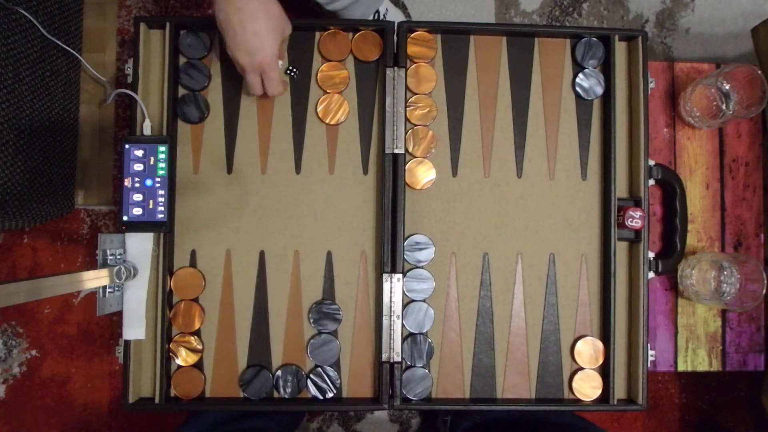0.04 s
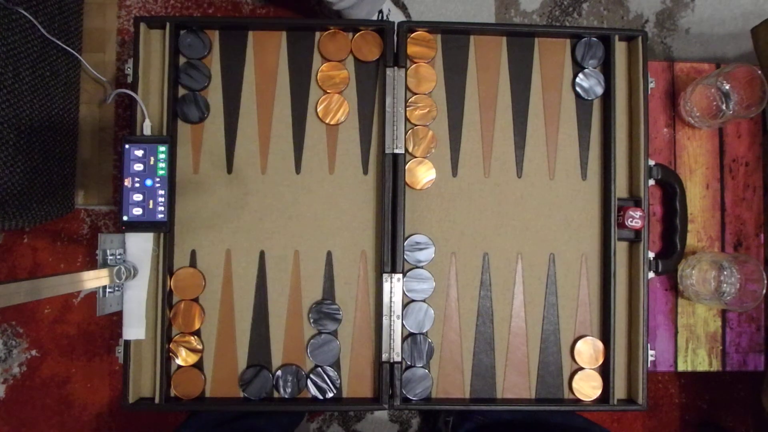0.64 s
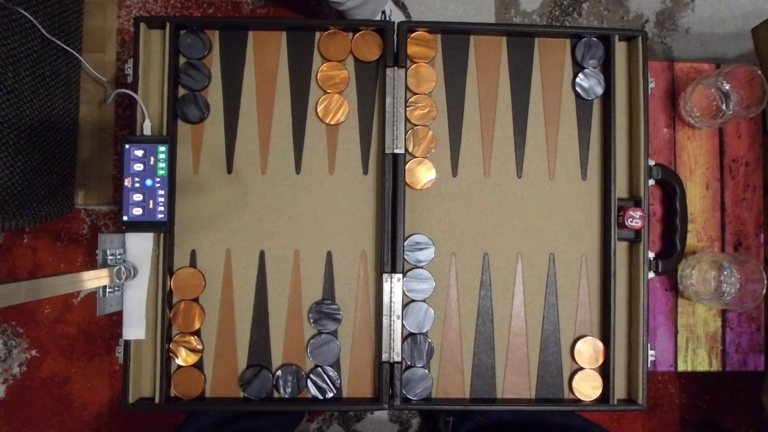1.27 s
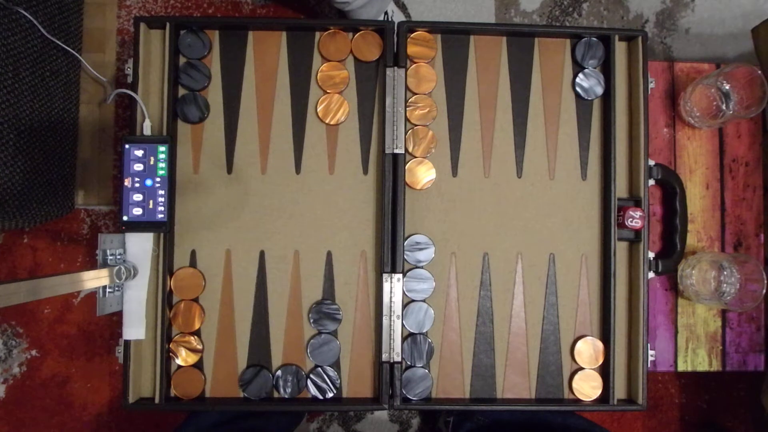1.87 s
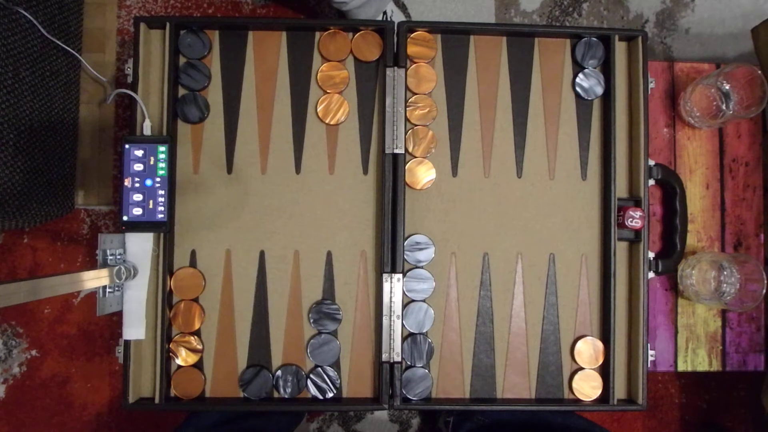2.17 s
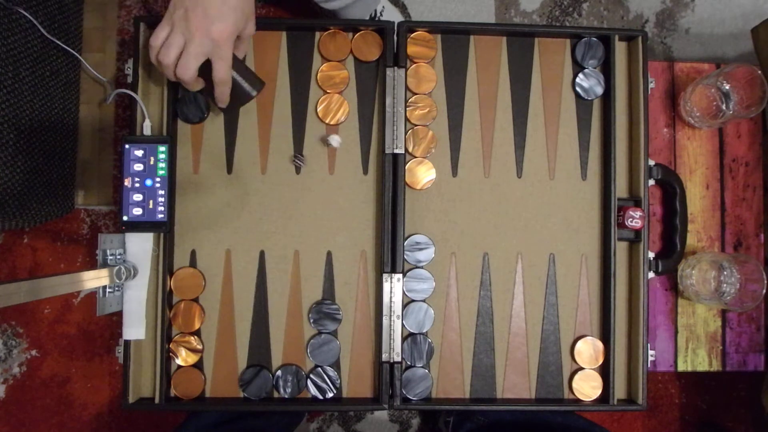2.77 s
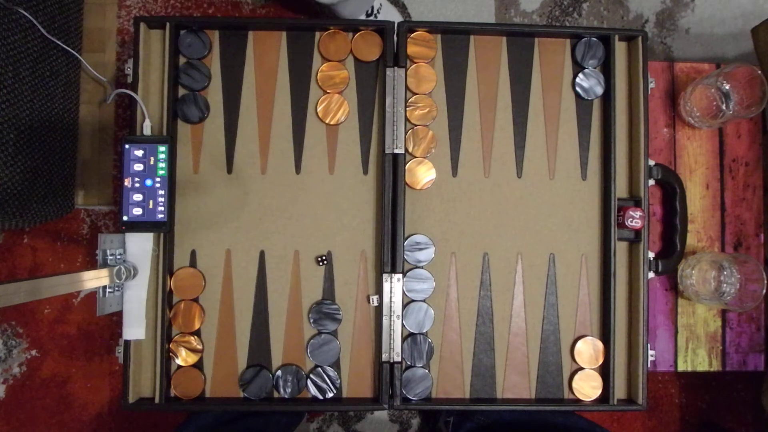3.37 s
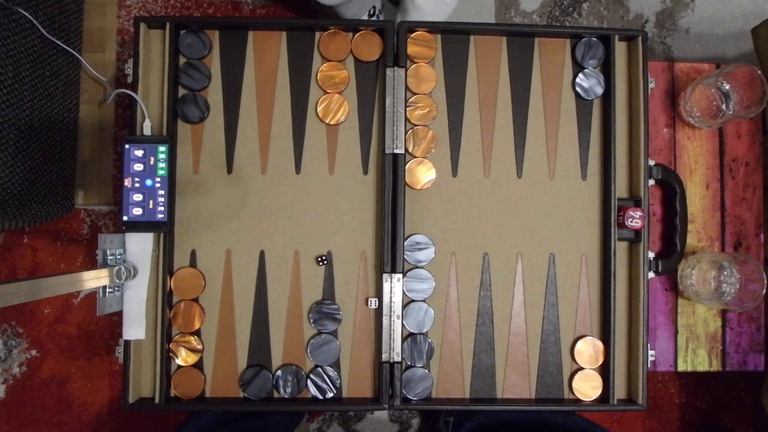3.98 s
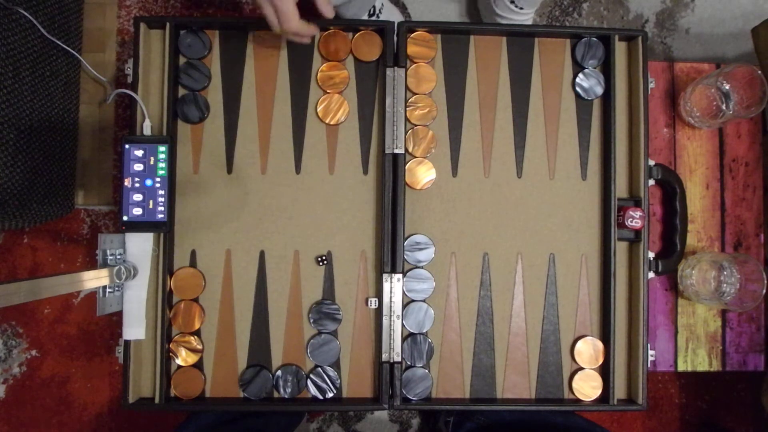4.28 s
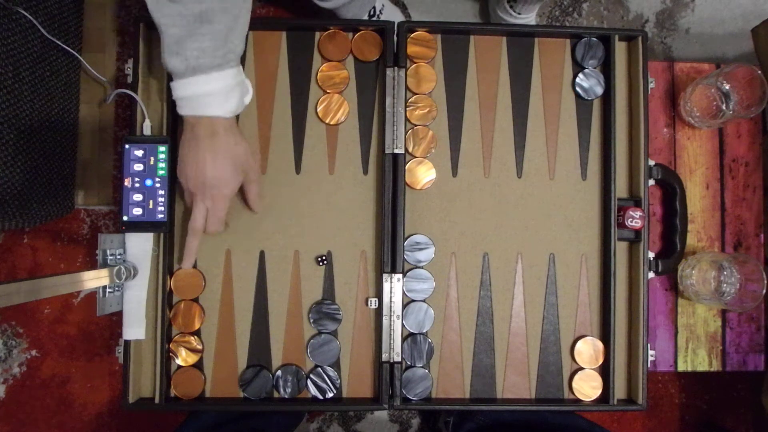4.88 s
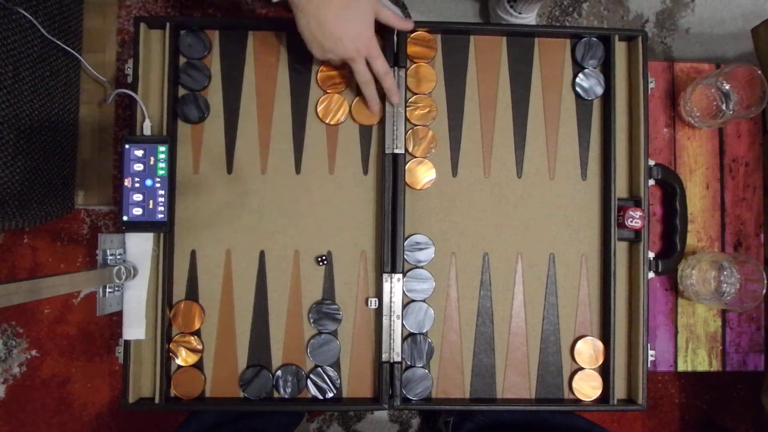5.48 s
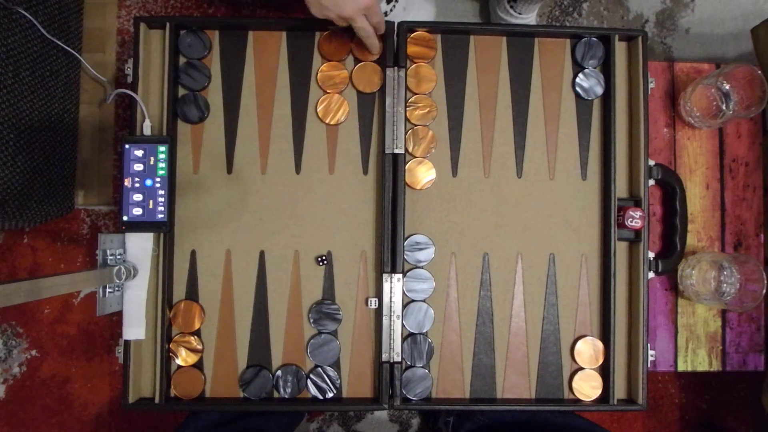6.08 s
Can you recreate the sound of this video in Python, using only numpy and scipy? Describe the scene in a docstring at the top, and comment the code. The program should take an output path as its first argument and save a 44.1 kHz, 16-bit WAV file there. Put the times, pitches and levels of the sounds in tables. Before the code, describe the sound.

Two dice are shaken in a hollow cup and thrown with sharp wooden knocks, followed by a sliding checker and one clack.

```python
"""A small room with a backgammon game, heard from above the board.
Two dice are picked up and shaken in a hand-covered cup: they click together, knock on its wall
and make its air column hoot at every bump. Thrown, they thud over the wooden board, ring its case
and settle on the felt. The cup slides aside with a rumble, and a checker is put down and pushed
against its neighbour with a clack. Room tone and a soft hiss lie underneath."""
import sys
import numpy as np
from scipy import signal
from scipy.fft import rfft, irfft
from scipy.io import wavfile

SR = 44100
rng = np.random.default_rng(int(sys.argv[2]) if len(sys.argv) > 2 else 0)


def wav_record(signal):
    """Record a signal, one row per channel, as 16-bit PCM in the file named by sys.argv[1]."""
    frames = np.transpose(np.atleast_2d(signal))
    bounded = np.clip(frames, -1, 1)
    # unit amplitude maps onto the largest positive 16-bit level
    quanta = np.round(bounded * 32767).astype(np.int16)
    wavfile.write(sys.argv[1], SR, quanta)


N = 270333
SCENE_T = np.arange(N) / SR
HIT_T = np.arange(SR // 2) / SR  # time axis of one hit
HZ = np.fft.rfftfreq(len(HIT_T), 1 / SR)


def amp(db):
    """Decibels to gain."""
    return 10 ** (np.asarray(db) / 20)


def unit(x):
    """Scales to energy 1."""
    return x / np.sqrt(np.sum(x ** 2) + 1e-20)


def peaked(x, db):
    """Scales the envelope's peak to db."""
    return amp(db) * x / abs(signal.hilbert(x)).max()


def curve(points, hz):
    """Reads a table on a log-frequency axis."""
    knots_hz, values = np.transpose(points)
    return np.interp(np.log(hz + 1), np.log(knots_hz), values)


def add(mix, s, sound):
    """Lays a sound into the mix at s seconds."""
    part = mix[max(round(s * SR), 0):][:len(sound)]
    part += sound[:len(part)]


def colour(x, gain_db):
    """Minimum-phase EQ for one hit, with its gains on the axis HZ."""
    log_gain = np.log(amp(gain_db))
    mirrored = np.concatenate([log_gain, log_gain[-2:0:-1]])
    response = np.exp(np.conj(signal.hilbert(mirrored)))[:len(HZ)]
    return irfft(rfft(x) * response)


def tilt(db_per_octave):
    """Harder contacts lift the treble, softer ones lower it."""
    return db_per_octave * np.log2(np.maximum(HZ, 2500) / 2500)


def contact(scatter_db, t60):
    """A sharp impulse followed by its quickly dying scatter inside the object."""
    x = amp(scatter_db) * unit(rng.standard_normal(len(HIT_T)) * amp(-60 * HIT_T / t60))
    x[0] += 1
    return x


def ring(modes):
    """Dying modes; each place of impact drives them a little differently."""
    hz, db, t60 = np.transpose(modes)[:, :, None]
    drive = amp(db + rng.standard_normal(hz.shape)) * rng.choice([-1, 1], hz.shape)
    partials = drive * amp(-60 * HIT_T / t60) * np.cos(2 * np.pi * hz * HIT_T)
    return unit(partials.sum(0))


def noise(eq):
    """Steady noise of rms 1, shaped by an EQ curve."""
    gain = amp(curve(eq, np.fft.rfftfreq(N, 1 / SR)))
    return np.sqrt(N) * unit(irfft(rfft(rng.standard_normal(N)) * gain, N))


def stereo(a, b, likeness):
    """Two unrelated sounds become two channels with the given likeness."""
    same = np.clip(curve(likeness, np.fft.rfftfreq(len(a), 1 / SR)), -1, 1)
    mid = rfft(a) * np.sqrt((1 + same) / 2)
    side = rfft(b) * np.sqrt((1 - same) / 2)
    return irfft(np.array([mid + side, mid - side]), len(a))


# Colour of the background bed. Each row: frequency in Hz, gain in dB.
BED_EQ = [(15, -58), (25, -28), (185, -1.5), (607, -3.5), (775, -6), (1330, -9), (2050, -14.5),
          (3250, -18.5), (14000, -17.5), (16000, -28)]
# Its stereo image. Each row: frequency in Hz, left-right likeness from 0 to 1.
BED_LIKENESS = [(40, 0.26), (125, 0.1), (400, 0.43), (1500, 0.3), (4000, 0.56), (9000, 0.017)]
# The bed sinks for a while. Each row: time in seconds, gain in dB.
BED_DIP = [(1.2, -0.5), (1.8, -9.5), (2.3, -4), (2.9, -1.5)]


def room_tone(level_db=-49.5):
    """A wide bed of room tone and microphone hiss that dips during the shaking."""
    fader_db = level_db + np.interp(SCENE_T, *np.transpose(BED_DIP))
    return amp(fader_db) * stereo(noise(BED_EQ), noise(BED_EQ), BED_LIKENESS)


# Length of the reverb. Each row: frequency in Hz, seconds to fall 60 dB.
REVERB_T60 = [(150, 0.08), (400, 0.72), (1000, 0.6), (3000, 0.46), (7500, 0.34), (13000, 0.28)]
# Its stereo image. Each row: frequency in Hz, left-right likeness from 0 to 1.
REVERB_LIKENESS = [(300, 0.97), (2000, 1), (4000, 0.9), (8000, 0.093), (13000, 0.14)]


def room(x, wet_db, echo_db, flight_s, echo_s=0.0081, build_s=0.0038):
    """Direct sound after its flight, one echo off a near surface, and a tail that darkens."""
    fade_in = 1 - np.exp(-(np.arange(SR) / SR / build_s) ** 2)
    tails = []
    for white in rng.standard_normal((2, SR)):
        hz, t, bands = signal.stft(white, SR, nperseg=256)
        decay = amp(-60 * t / curve(REVERB_T60, hz)[:, None])
        tail = signal.istft(bands * decay, SR, nperseg=256)[1][:SR]
        tails.append(unit(tail * fade_in))
    response = amp(wet_db) * stereo(*tails, REVERB_LIKENESS)
    response[:, 0] += 1
    response[0, round(echo_s * SR)] += amp(echo_db)
    response[1, round(echo_s * SR) + 1] += amp(echo_db)  # the echo arrives from the left
    arriving = np.pad(x, (round(flight_s * SR), 0))
    return signal.fftconvolve(arriving[None], response, axes=1)[:, :N]


# Airy colour of the rustle. Each row: frequency in Hz, gain in dB.
RUSTLE_EQ = [(500, -22), (1800, 6.5), (3300, 1.5), (4500, 0.5), (6300, 4), (9000, -5.5), (13000, -6.5)]


def arm_rustle(start_s=2.85, end_s=4.695, fade_s=0.083, level_db=-57):
    """A soft, high rustle fades in, holds and fades out as the arm draws back."""
    envelope = np.clip(np.minimum(SCENE_T - start_s, end_s - SCENE_T) / fade_s, 0, 1)
    return amp(level_db) * envelope * noise(RUSTLE_EQ)


# The cup slides on the table, then the checker on the felt.
# Each row: hardest push in seconds, level in dB, swell and fade in dB per second.
PUSHES = [(3.93, -29.5, 27, 450), (5.38, -45, 29, 73), (5.396, -25, 898, 223)]
# Dark colour of the friction. Each row: frequency in Hz, gain in dB.
FRICTION_EQ = [(50, -14), (135, -0.5), (330, 5.5), (480, 1.5), (700, -10.5), (1300, -19.5), (3500, -34),
               (8000, -33)]


def slides(level_db=-10):
    """Sliding things rumble through the board as hard as they are pushed."""
    push = sum(amp(db - np.maximum(swell * (s - SCENE_T), fade * (SCENE_T - s)))
               for s, db, swell, fade in PUSHES)
    return amp(level_db) * push * noise(FRICTION_EQ)


# A die hits the rim; later comes a faint touch.
# Each row: start in seconds, level in dB, pitch in Hz, seconds to fall 60 dB.
PING_CUES = [(2.963, -20.5, 3180, 0.0091), (4.293, -39, 4920, 0.03)]


def pings(tick_db=-3):
    """A hard tick sets off one brief, high ring."""
    out = np.zeros(N)
    for s, db, hz, t60 in PING_CUES:
        band_db = -6 * np.log2((HZ + 100) / hz) ** 2  # the tick is centred on the ring
        tick = colour(contact(scatter_db=15, t60=0.0051), np.maximum(band_db, -60))
        tone = amp(-60 * HIT_T / t60) * np.sin(2 * np.pi * hz * HIT_T)
        add(out, s, peaked(tone, db) + peaked(tick, db + tick_db))
    return out


# A checker is touched, then struck.
# Each row: start in seconds, level in dB, treble tilt in dB per octave.
CHECKER_HITS = [(5.3804, -36, -4), (5.6586, -14.5, -1)]
# Colour of its clack. Each row: frequency in Hz, gain in dB.
CHECKER_EQ = [(50, -36), (140, -2.5), (450, -0.5), (1100, -7.5), (1800, -4), (3300, -3), (4600, 0),
              (6500, -6.5), (8300, -17), (9450, -3.5), (10500, -15), (15000, -44)]
# Its ringing modes. Each row: frequency in Hz, level in dB, seconds to fall 60 dB.
CHECKER_RING = [(520, 1, 0.11), (1735, -2, 0.041), (2190, 1.5, 0.053), (3100, -12, 0.07), (3490, 3, 0.11),
                (4800, 3, 0.035)]


def checkers(level_db=2.5, ring_db=-9, chatter_s=0.0023):
    """A struck checker makes contact twice in quick succession and rings briefly."""
    out = np.zeros(N)
    for s, db, tilt_db in CHECKER_HITS:
        contacts = contact(scatter_db=2, t60=0.015)
        add(contacts, chatter_s, contact(scatter_db=3, t60=0.016))
        clack = unit(colour(contacts, curve(CHECKER_EQ, HZ))) + amp(ring_db) * ring(CHECKER_RING)
        add(out, s, peaked(colour(clack, tilt(tilt_db)), db + level_db))
    return out


def board_spot(hz, boost_db, bass_db, width_hz=94, shelf_hz=257):
    """Each spot of the board has its own broad resonance and more or less bass."""
    resonance_db = boost_db / (1 + ((HZ - hz) / width_hz) ** 2)
    return resonance_db + bass_db / (1 + (HZ / shelf_hz) ** 4)


# Woody colour of the board. Each row: frequency in Hz, gain in dB.
WOOD_EQ = [(40, -40), (90, -40), (135, -17), (220, -20.5), (420, 2.5), (650, 0), (1100, 2.5), (1700, 0),
           (2300, -9), (4000, -17), (10000, -29)]
# Modes of its case. Each row: frequency in Hz, level in dB, seconds to fall 60 dB.
CASE_RING = [(135.6, -21.5, 0.41), (269.8, -9, 0.28), (340.6, -11, 0.62), (402, -10.5, 0.45),
             (545, 1.5, 0.072), (637.7, 0.5, 0.18), (905, 3.5, 0.16), (1140, 2.5, 0.12), (1187, -1, 0.15),
             (1326, 0, 0.18), (1606, 3.5, 0.12)]


def thud(spot_db, corner_hz, steepness, ring_db=-9):
    """One contact gives a woody thud and rings the case, rolled off above its corner."""
    wood = unit(colour(contact(scatter_db=-2, t60=0.011), curve(WOOD_EQ, HZ)))
    softness_db = np.maximum(-10 * np.log10(1 + (HZ / corner_hz) ** steepness), -100)
    return colour(wood + amp(ring_db) * ring(CASE_RING), softness_db + spot_db)


# Dice are picked up and roll from edge to edge; fingers land.
# Each row: start in seconds, level in dB, pitch of the spot in Hz.
FELT_KNOCKS = [(0.213, -34, 472), (0.223, -36, 490), (2.993, -26, 417), (3.026, -22, 373),
               (3.059, -27, 417), (3.111, -25.5, 365), (3.216, -27, 405), (3.296, -29.5, 410),
               (3.343, -36, 420), (3.429, -41, 400), (4.768, -37.5, 302), (5.97, -42, 290)]


def felt_knocks(level_db=1):
    """Felt softens the contact: dull, hollow knocks with little bass."""
    out = np.zeros(N)
    for s, db, hz in FELT_KNOCKS:
        knock = thud(board_spot(hz, boost_db=9, bass_db=-7), corner_hz=544, steepness=5.2)
        add(out, s, peaked(knock, db + level_db))
    return out


# Blows on the board, led by the thrown dice.
# Each row: start in seconds, level in dB, pitch of the spot in Hz, bass shelf in dB.
BOARD_BLOWS = [(2.794, -5.5, 654, 0), (2.824, -8.5, 580, -1.5), (2.84, -18.5, 855, -5.5),
               (2.938, -17, 750, -11), (2.961, -17, 820, -19), (3.162, -20.5, 405, -4),
               (3.908, -32, 390, -3.5), (3.925, -28, 440, -2), (5.389, -28.5, 484, 5)]


def board_blows(level_db=3.5, full_corner_hz=1260, octaves_per_db=0.51):
    """Thuds on wood; a gentle blow is a longer contact, so it sounds duller."""
    out = np.zeros(N)
    for s, db, hz, bass_db in BOARD_BLOWS:
        corner_hz = full_corner_hz * 2 ** (octaves_per_db * db)
        blow = thud(board_spot(hz, boost_db=5.5, bass_db=bass_db), corner_hz, steepness=2.22)
        add(out, s, peaked(blow, db + level_db))
    return out


# How hard the cup is shaken. Each row: time in seconds, vigour in dB.
SHAKE_VIGOUR = [(0.83, -12), (1.25, -2.5), (1.45, 8), (1.9, -1.5), (2.1, 6.5), (2.4, 3), (2.56, -5.5)]


def light_tumbling(level_db, spread_db, count):
    """Start times and levels of light, uneven contacts in the cup, as strong as the shaking."""
    knots_s, vigour_db = np.transpose(SHAKE_VIGOUR)
    jitter, strength = rng.random((count, 2)).T
    starts = knots_s[0] + (knots_s[-1] - knots_s[0]) * (np.arange(count) + jitter) / count
    levels = level_db + np.interp(starts, knots_s, vigour_db) + spread_db * (strength - 0.5)
    return zip(starts, levels)


# Die clacks on die. Each row: start in seconds, level in dB, treble tilt in dB per octave.
DICE_CLACKS = [(0.1682, -31.5, 0), (0.174, -32, -2), (0.2225, -26, -0.5), (0.805, -25.5, -6),
               (0.859, -26, -4), (0.889, -24.5, 6.5), (0.941, -29.5, -8), (1.046, -25.5, -11.5),
               (1.1578, -23.5, 4), (1.1716, -16.5, 2.5), (1.3129, -8, 3), (1.349, -22.5, 2), (1.414, -9, 2),
               (1.5342, -13, 1), (1.541, -21, 3), (1.6321, -14, 3.5), (1.789, -27.5, -4),
               (1.8287, -11.5, 9), (1.836, -22.5, 10), (2.016, -18, 6), (2.047, -28.5, 3),
               (2.2191, -14, 7.5), (2.372, -36, -13), (2.4274, -26.5, -8), (2.7946, -23.5, -3),
               (2.93, -27, -12.5), (3.027, -32.5, -11)]
# Bright colour of a die. Each row: frequency in Hz, gain in dB.
DIE_EQ = [(60, -15), (1500, -19.5), (3200, -8), (4800, -9.5), (6500, -1.5), (7800, 1), (8800, -4.5),
          (10500, -8.5), (12200, -27), (16000, -45)]


def dice_clicks(level_db=2, light_tilt_db=-4):
    """Hard dice click together; the click bounces about inside the cup."""
    out = np.zeros(N)
    light = [(s, db, light_tilt_db) for s, db in light_tumbling(level_db=-36, spread_db=6, count=36)]
    for s, db, tilt_db in DICE_CLACKS + light:
        click = colour(contact(scatter_db=1.5, t60=0.015), curve(DIE_EQ, HZ) + tilt(tilt_db))
        add(out, s, peaked(click, db + level_db))
    return out


def hoot(hz, db, swell_s=0.0013, samples=2048):
    """The cup's air column swells for a few cycles and dies, roughened by the die's scraping."""
    t = HIT_T[:samples]
    air = (t / swell_s) ** 2 * np.exp(-t / swell_s) * np.sin(2 * np.pi * hz * t)
    scrape = contact(scatter_db=-7, t60=0.028)[:samples]
    return peaked(signal.fftconvolve(air, scrape)[:samples], db)


# Dice bump the cup hard; the hoot's pitch moves as the hand opens and closes the mouth.
# Each row: start in seconds, level in dB, trim of the wall knock in dB, pitch in Hz.
CUP_BUMPS = [(0.692, -24.5, -21, 953), (0.806, -13.5, -4.5, 976), (0.876, -22.5, -17, 922),
             (0.942, -17, -29, 906), (1.047, -25.5, -22, 867), (1.099, -32.5, -5, 800),
             (1.308, -21, -13.5, 792), (1.389, -32.5, -12, 876), (1.416, -24.5, 3.5, 826),
             (1.459, -24.5, -12, 882), (1.627, -26, 1.5, 890), (1.825, -32, 4.5, 774),
             (1.866, -27.5, -15, 817), (1.976, -33.5, -14, 760), (2.014, -24, 0.5, 810),
             (2.05, -28.5, -9, 826), (2.215, -29.5, 2.5, 836), (2.252, -28.5, -10, 939),
             (2.334, -26, -16.5, 953), (2.669, -27.5, -8, 713), (2.709, -29.5, -16, 746)]
# Colour of the cup's wall. Each row: frequency in Hz, gain in dB.
WALL_EQ = [(100, -34), (600, -4.5), (1200, 5.5), (1700, 4), (2400, 5), (3300, -6.5), (4500, -13.5),
           (6500, -7.5), (10000, -26.5)]


def dice_cup(wall_db=7, graze_db=-15, rebound_db=-17, light_knock_db=-11, pitch_wander=0.11):
    """A die grazes the cup, bumps it with a hoot and a knock on the wall, and rebounds softly twice."""
    out = np.zeros(N)
    times, _, _, pitches = np.transpose(CUP_BUMPS)
    light = [(s, db, light_knock_db, np.interp(s, times, pitches))
             for s, db in light_tumbling(level_db=-36.5, spread_db=5, count=26)]
    for s, db, knock_db, hz in CUP_BUMPS + light:
        knock = colour(contact(scatter_db=2, t60=0.021), curve(WALL_EQ, HZ))
        add(out, s, hoot(hz, db))
        add(out, s, peaked(knock, db + knock_db + wall_db))
        side_db = min(db, -24)  # graze and rebounds stay light even after a hard bump
        add(out, s - rng.uniform(0.0033, 0.00612), hoot(hz, side_db + graze_db))
        for later_s in np.cumsum(rng.uniform(0.015, 0.041, 2)):
            rebound_hz = hz * (1 + pitch_wander * rng.standard_normal())
            add(out, s + later_s, hoot(rebound_hz, side_db + rebound_db))
    return out


def scene():
    """The game in the room, over the background bed; the right channel's polarity is flipped."""
    game = (room(dice_cup(), wet_db=-7, echo_db=-16, flight_s=0.00034)
            + room(dice_clicks() + arm_rustle(), wet_db=-3, echo_db=-11, flight_s=0.00074)
            + room(board_blows() + slides(), wet_db=-4.5, echo_db=-20.5, flight_s=0.0025)
            + room(pings(), wet_db=-11, echo_db=-14, flight_s=0.00021)
            + room(checkers(), wet_db=-2.5, echo_db=-16.5, flight_s=0.00069)
            + room(felt_knocks(), wet_db=-6, echo_db=-18, flight_s=0.001995))
    low_cut = signal.butter(3, 105, "high", fs=SR, output="sos")  # small things radiate no deep bass
    return (signal.sosfilt(low_cut, game) + room_tone()) * amp([[0.55], [-0.55]])


def record(dry, overload_db=-10, overload_hz=5000, port_hz=3280, port_width_hz=204, port_db=5,
           notch_spacing_hz=1024, notch_width_hz=80, top_hz=15900):
    """The microphone bends lopsidedly under sharp clicks; then its port ring, notches and high cut."""
    treble = signal.sosfilt(signal.butter(2, overload_hz, "high", fs=SR, output="sos"), dry)
    bent = dry + amp(overload_db) * treble ** 2
    port_ring = signal.lfilter(*signal.iirpeak(port_hz, port_hz / port_width_hz, SR), bent)
    mix = bent + amp(port_db) * port_ring
    for hz in notch_spacing_hz * np.arange(2, 7):
        mix = signal.lfilter(*signal.iirnotch(hz, hz / notch_width_hz, SR), mix)
    high_cut = signal.firwin(401, top_hz, window=("kaiser", 9), fs=SR)
    return signal.oaconvolve(mix, high_cut[None], "same")


dry = scene()
out = record(dry)
wav_record(out)
```